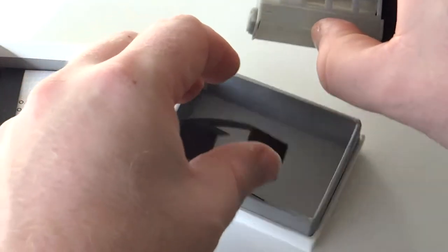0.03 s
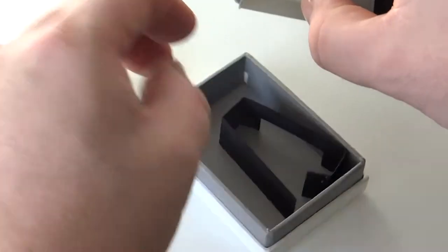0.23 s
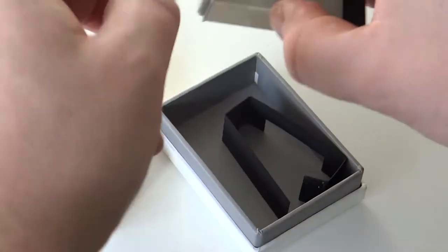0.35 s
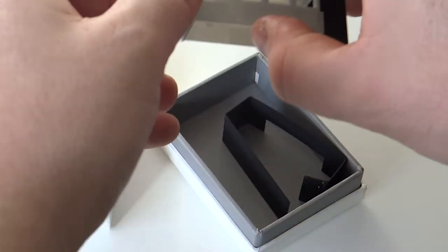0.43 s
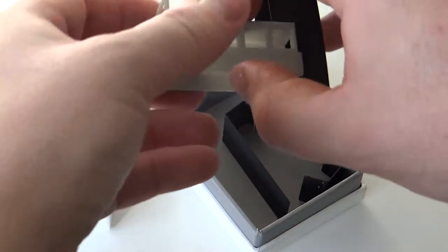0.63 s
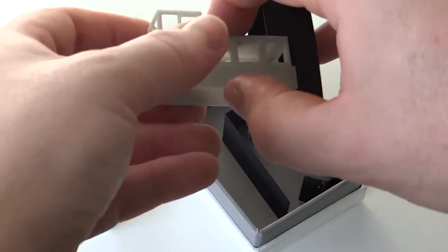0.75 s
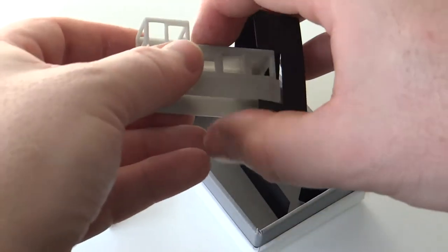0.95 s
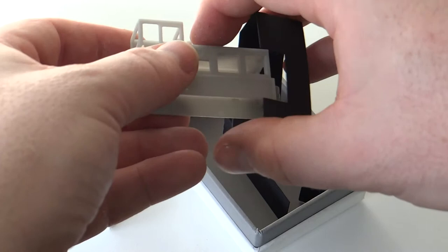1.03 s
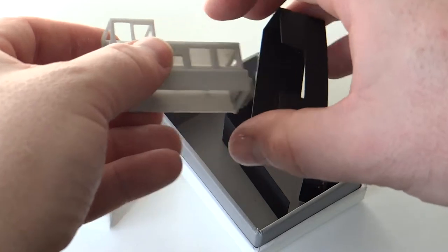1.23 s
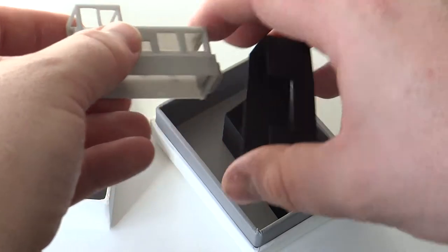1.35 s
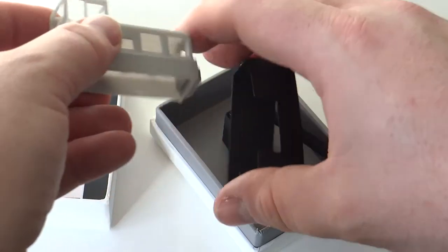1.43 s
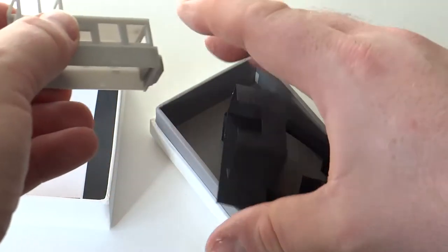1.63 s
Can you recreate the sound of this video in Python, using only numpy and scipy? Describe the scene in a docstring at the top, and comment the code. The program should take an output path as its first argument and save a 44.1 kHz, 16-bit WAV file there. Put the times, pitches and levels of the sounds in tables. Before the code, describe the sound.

A sharp plastic clack on a table, followed by faint scrapes and light taps.

```python
"""A table in a quiet room, where hard plastic kit parts are handled close to the microphone.
A loose part shifts in a shallow tray, then the tray lands corner first with a sharp double clack.
Fingers ease two parts apart with faint scrapes, and one part is tapped down into the tray.
Each hit is a click, a crack and a ring; each scrape is a rush of tiny slips.
Mains hum and soft room tone lie underneath."""
import sys
import numpy as np
from scipy import signal
from scipy.fft import rfft, irfft
from scipy.io import wavfile

SR = 44100
rng = np.random.default_rng(int(sys.argv[2]) if len(sys.argv) > 2 else 0)


def transcribe(u):
    """Save the signal u as a 16-bit wav file named by the first command-line argument.

    u: samples, shape (n,) or (channels, n), limited to [-1, 1]; the rate is SR.
    q: integer samples, one column per channel.
    """
    v = np.clip(np.atleast_2d(u).T, -1, 1)
    q = np.round(v * 32767).astype(np.int16)
    wavfile.write(sys.argv[1], SR, q)


N = 74970

# Hits of the loose part, tray corner, flat tray and tapped part: start_s, level_db, tilt_db_per_octave,
# contact_s
LOOSE_HITS = [(0.0, -23.5, -11, 0.0049), (0.0468, -21, -3.5, .001), (0.0649, -7.5, -2, 0.00017),
              (0.0917, -8.5, -7, 0.00067), (0.098, -10, .5, 0.00096), (0.1225, -18, 8, .001)]
CORNER_HITS = [(0.2168, -1, -0.5, 0.00036)]
TRAY_HITS = [(0.2327, 13, 0, .0002), (0.2359, 12.5, .8, .0005)]
TAP_HITS = [(1.5738, -3, 1.5, 0.00068), (1.6026, -5.5, 0.5, 0.00096), (1.621, -15.5, -3.5, .0015),
            (1.639, -16.5, 6, 0.0037), (1.6665, -17, -2, 0.0022)]
# Slides of plastic on plastic: start_s, length_s, level_db, rise_share
SCRAPE_STROKES = [(0.171, 0.043, -53, .15), (0.593, 0.015, -57, 0.25), (0.624, 0.014, -62.5, 0.34),
                  (0.663, 0.037, -63.5, 0.36), (0.771, 0.035, -66, .1), (0.824, 0.0077, -56.5, .08),
                  (0.845, 0.017, -65.5, 0.34), (0.874, 0.056, -62.5, 0.37), (0.924, 0.018, -58, 0.69),
                  (0.978, 0.066, -62.5, 0.21), (1.052, 0.031, -59, 0.31), (1.108, 0.064, -72.5, 0.43),
                  (1.457, 0.039, -68.5, 0.25), (1.661, 0.029, -58, .3)]
# Ringing modes of each object: pitch_hz, level_db, t60_s
LOOSE_MODES = [(796, -13, 0.098), (915, -9, 0.036), (1690, -3.5, 0.036), (2240, 2, .2), (3060, -5, 0.06),
               (3880, 1, .05), (5560, -6, .05), (6240, -15, .04), (8200, -12, .04), (8900, -13.5, .04),
               (10480, -8.5, .05)]
SCRAPE_MODES = [(1727, -0.5, 0.023), (4660, -34, 0.017), (6020, -8, .06), (8630, 0, 0.044),
                (9720, -5, 0.034)]
CORNER_MODES = [(1017, 0.5, .04), (1632, 3.5, 0.033), (2200, 10, 0.019), (2615, 8, 0.029),
                (3014, -12, 0.039)]
TRAY_MODES = [(981, -15, .09), (1623, -4, 0.017), (1920, -13, 0.078), (2226, 6, .1), (2227, -1.5, .12),
              (3580, -3, .14), (4000, -8, .09), (4000, -25, 0.086), (4250, 0.5, 0.15), (4748, 8, 0.104),
              (4810, 16, 0.05), (5500, -24, 0.069), (5940, -16, .1), (6688, -9.5, .09)]
TAP_MODES = [(934, 3, 0.03), (1740, -9, 0.045), (2080, -19, 0.024), (2260, -12, 0.0264), (2600, 2, 0.075),
             (2970, 1.5, 0.063), (3760, 4, 0.016), (3993, -5.5, 0.067), (5000, 4.5, 0.032),
             (5614, 8, 0.032), (5470, 2.5, 0.026), (7470, 3.5, 0.11), (8300, -9.5, .03), (10340, -7, 0.034)]
# Tone of each object's crack, its dense, short-lived modes: frequency_hz, gain_db
LOOSE_CRACK = [(200, -20), (550, -12), (850, -10), (1700, 0), (4500, 1), (8000, 2.5), (10000, -10),
               (15500, -22.5)]
CORNER_CRACK = [(200, -13.5), (650, -36), (1000, -9.5), (2400, 1), (3700, -3), (5200, -8), (9000, -16),
                (11000, -22), (15500, -31)]
TRAY_CRACK = [(200, -33), (700, -34.5), (1000, -13.5), (1300, -18), (1650, -1.5), (2100, 3), (2700, -3),
              (3400, 2.5), (4800, 0.5), (6000, -2), (8000, -5.5), (10500, -14), (12500, -22.5),
              (15500, -31)]
TAP_CRACK = [(200, -26.5), (600, -11), (1400, -9), (1900, 9), (3000, -12), (3900, 11), (4500, -7),
             (7500, -3), (9000, -12.5), (15500, -27)]
# Blend of each object's hit: ring_db, click_db, burst_db, burst_t60_s
LOOSE_BLEND = (-5, -12, -1, .017)
CORNER_BLEND = (-3, -20, 0, .017)
TRAY_BLEND = (-7, -13, 0, .016)
TAP_BLEND = (-2, -18, -2, .019)
# Tone of the friction: frequency_hz, gain_db
SCRAPE_EQ = [(500, -49), (1300, -0.5), (2600, -9.5), (4000, -5), (5400, 0.5), (9500, -3.5), (11500, -15.5),
             (15500, -20)]
# Reflections off the table top, hands and near wall: delay_s, level_db
ECHOES = [(.00087, -24), (.00217, -14), (.0027, -7.5), (.0056, -7), (.0065, -27), (.0086, -12.5),
          (.021, -10.5)]
# Reverb tail by band: frequency_hz, t60_s, level_db
TAIL_BANDS = [(300, .35, 5.5), (1560, .29, 0.5), (4000, 0.3, 0.5), (8000, 0.29, -3), (11000, .21, -6),
              (15000, .17, -5.5)]
# Colour of the room tone, and the extra shaping of its stereo side: frequency_hz, gain_db
ROOM_TONE_EQ = [(20, -13.5), (45, 6.5), (80, 0.5), (160, 2.5), (330, -3.5), (560, 2), (900, -8),
                (2500, -16.5), (9000, -16.5), (15500, -25.5)]
ROOM_TONE_SIDE_EQ = [(30, -18.5), (120, -10), (300, -1.5), (600, -3), (1500, 2), (8000, -10),
                     (13000, -20.5)]

TIME = np.arange(N) / SR
RING_TIME = np.arange(int(.45 * SR)) / SR  # span of one ring or reverb tail
SIDE = np.array([[1], [-1]])  # adds to the left, subtracts from the right


def undb(db):
    """Decibels to gain."""
    return 10 ** (np.asarray(db) / 20)


def unit(x):
    """Scale to an energy of 1."""
    return x / np.sqrt(np.sum(x ** 2) + 1e-18)


def hiss(length=N):
    """White noise."""
    return rng.standard_normal(length)


def convolve(x, response):
    """Pass a sound through a response."""
    return signal.fftconvolve(x, response)[:N]


def on_log(hz, points):
    """Read (Hz, value) points on a log-frequency axis."""
    points = np.array(points, float)
    return np.interp(np.log(np.maximum(hz, 1)), np.log(points[:, 0]), points[:, 1])


def eq(x, points):
    """Minimum-phase EQ that follows (Hz, dB) points."""
    size = 2048 if len(x) < N else 16384
    gain = undb(on_log(np.fft.rfftfreq(size, 1 / SR), points))
    cepstrum = irfft(np.log(gain))
    cepstrum[1:size // 2] *= 2
    cepstrum[size // 2 + 1:] = 0
    return convolve(x, irfft(np.exp(rfft(cepstrum))))[:len(x)]


def fade(t60):
    """Exponential decay, 60 dB down after t60 seconds."""
    return np.exp(-np.log(1000) * RING_TIME / t60)


def start_at(x, start_s):
    """Place a sound on the timeline."""
    return np.pad(x, (int(start_s * SR), N))[:N]


def ringing(modes):
    """An object's ring: one decaying sine per mode."""
    phases = rng.uniform(0, 2 * np.pi, len(modes))
    return unit(sum(undb(db) * unit(np.sin(2 * np.pi * hz * RING_TIME + phase) * fade(t60))
                    for (hz, db, t60), phase in zip(modes, phases)))


def plastic_hits(hits, modes, crack_eq, blend, blunt_s=.001, pivot_hz=3500):
    """Each contact clicks, cracks and rings; a longer contact slows the attack and blunts the click."""
    ring_db, click_db, burst_db, burst_t60 = blend
    ring = undb(ring_db) * ringing(modes)
    track = np.zeros(N)
    for start_s, level_db, tilt_db, contact_s in hits:
        attack = 1 - np.exp(-(RING_TIME + 1 / SR) / contact_s)
        click = signal.unit_impulse(len(ring)) * undb(click_db) / (1 + (contact_s / blunt_s) ** 2)
        burst = unit(hiss(len(ring)) * attack * fade(burst_t60))
        crack = unit(eq(click + undb(burst_db) * burst, crack_eq))
        tilt = [(pivot_hz / 4, -2 * tilt_db), (pivot_hz * 2, tilt_db)]
        hit = unit(eq(ring * attack + crack, tilt))
        track += undb(level_db) * start_at(hit, start_s)
    return track


def loose_part():
    """A loose part shifts in the tray with a quick, light rattle."""
    return plastic_hits(LOOSE_HITS, LOOSE_MODES, LOOSE_CRACK, LOOSE_BLEND)


def scrapes(grain_db=4.5, ring_db=-5.5):
    """Short slides, each a rush of tiny uneven slips that also ring the held parts."""
    pressure = np.zeros(N)
    for start_s, length_s, level_db, rise_share in SCRAPE_STROKES:
        corners_s = [start_s, start_s + rise_share * length_s, start_s + length_s]
        pressure += undb(level_db) * np.sqrt(np.interp(TIME, corners_s, [0, 1, 0]))
    grit = unit(hiss() * undb(grain_db * hiss())) * np.sqrt(N)
    rasp = unit(eq(signal.unit_impulse(len(RING_TIME)), SCRAPE_EQ))
    body = unit(rasp + undb(ring_db) * ringing(SCRAPE_MODES))
    return convolve(pressure * grit, body)


def tray_landing():
    """One corner knocks first, then the tray drops flat and chatters in a bright double clack."""
    knock = plastic_hits(CORNER_HITS, CORNER_MODES, CORNER_CRACK, CORNER_BLEND)
    clack = plastic_hits(TRAY_HITS, TRAY_MODES, TRAY_CRACK, TRAY_BLEND)
    return knock + clack


def tapped_part():
    """A part is tapped down into the tray: two clear ticks and three softer ones."""
    return plastic_hits(TAP_HITS, TAP_MODES, TAP_CRACK, TAP_BLEND)


def room_tail(build_s=.0037):
    """Diffuse decay of a small room in half-octave bands, shorter and weaker in the treble."""
    size, table = len(RING_TIME), np.array(TAIL_BANDS)
    hz = np.fft.rfftfreq(size, 1 / SR)
    bands = np.round(2 * np.log2(np.maximum(hz, 500) / 500))
    spectrum = rfft(hiss(size))
    build = 1 - np.exp(-(RING_TIME / build_s) ** 2)
    tail = np.zeros(size)
    for band in np.unique(bands):
        inside = bands == band
        t60, db = (on_log(hz[inside].mean(), table[:, [0, column]]) for column in (1, 2))
        tail += undb(db) * irfft(spectrum * inside, size) * unit(fade(t60) * build)
    return tail


def room(x, tail_db=-3, width_db=-10, pan_db=-.1):
    """Direct sound and near echoes sit almost dead centre, in a narrow stereo tail."""
    near = x + sum(undb(db) * start_at(x, delay_s) for delay_s, db in ECHOES)
    mid, side = (undb(tail_db) * convolve(x, room_tail()) for _ in range(2))
    return near * undb(SIDE * pan_db / 2) + mid + undb(width_db) * side * SIDE


def room_tone(level_db=-63.5):
    """A soft stereo bed of dark noise."""
    mid, side = (undb(level_db) * np.sqrt(N) * unit(eq(hiss(), ROOM_TONE_EQ)) for _ in range(2))
    return mid + eq(side, ROOM_TONE_SIDE_EQ) * SIDE


def mains_hum(pitch_hz=119.1, level_db=-68, waver_db=.6):
    """A low, steady-pitched mains tone whose level wavers slightly."""
    waver = np.interp(TIME, np.linspace(0, TIME[-1], 16), hiss(16))
    return np.sqrt(2) * undb(level_db - waver_db * waver) * np.sin(2 * np.pi * pitch_hz * TIME)


def scene(hits_db=-11):
    """Hits and scrapes play in the room, over the room tone and hum."""
    hits = loose_part() + tray_landing() + tapped_part()
    return room(undb(hits_db) * hits + scrapes()) + room_tone() + mains_hum()


def record(dry):
    """A steep low-pass trims the air above 16 kHz."""
    return signal.sosfilt(signal.ellip(8, .2, 70, 16000, fs=SR, output="sos"), dry)


dry = scene()
out = record(dry)
transcribe(out)
```